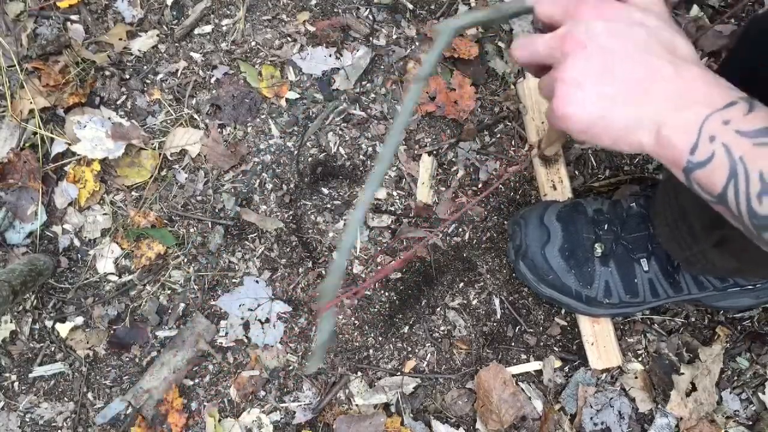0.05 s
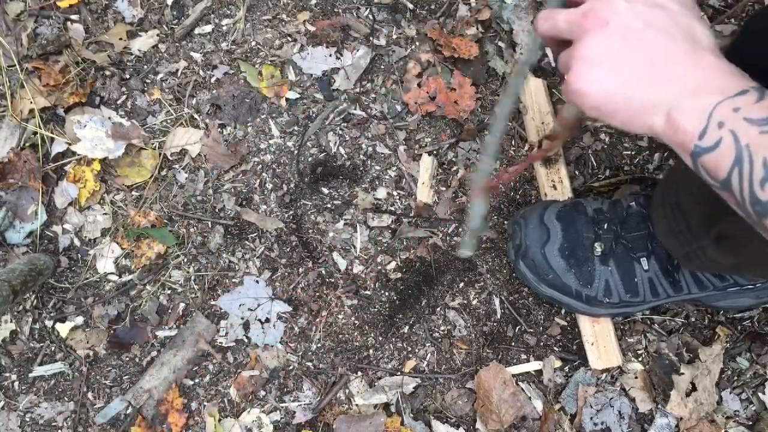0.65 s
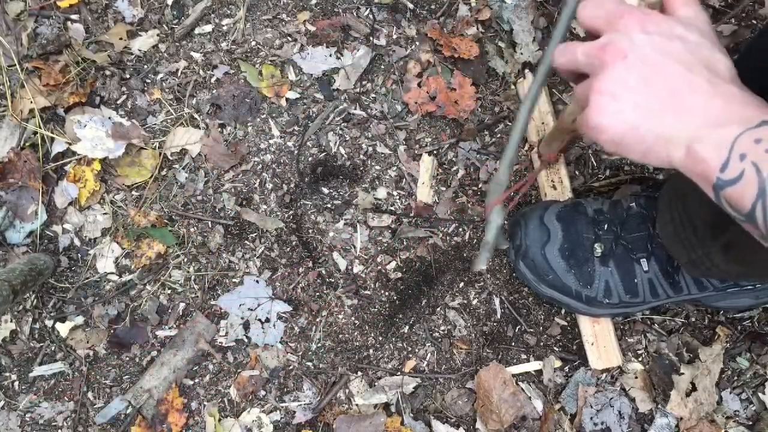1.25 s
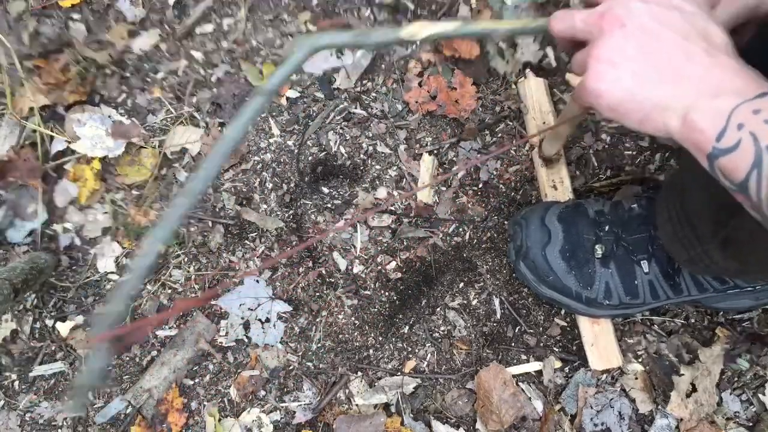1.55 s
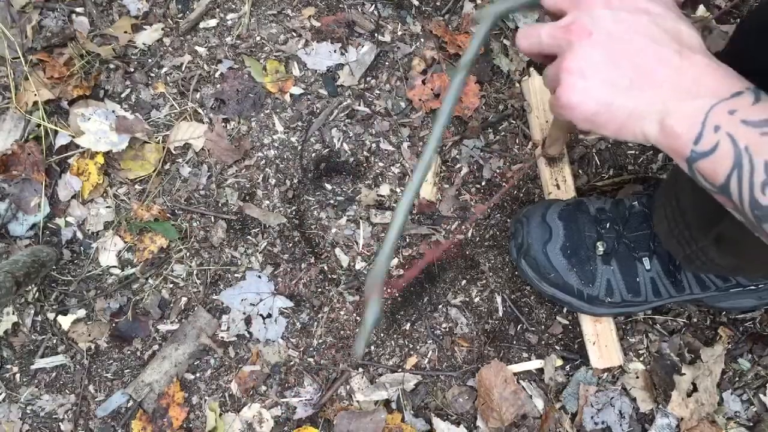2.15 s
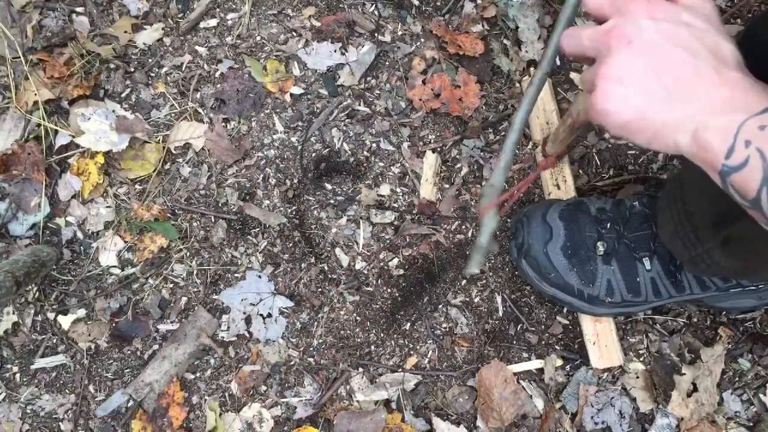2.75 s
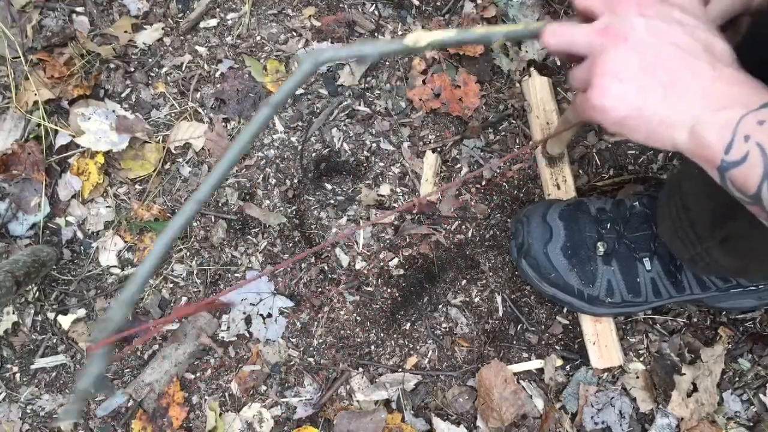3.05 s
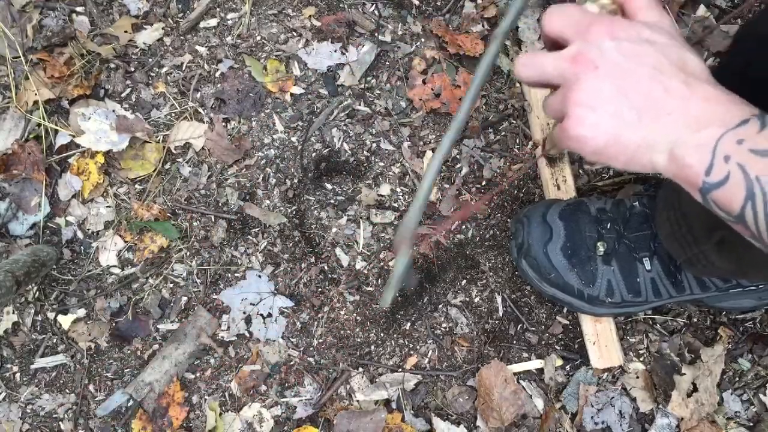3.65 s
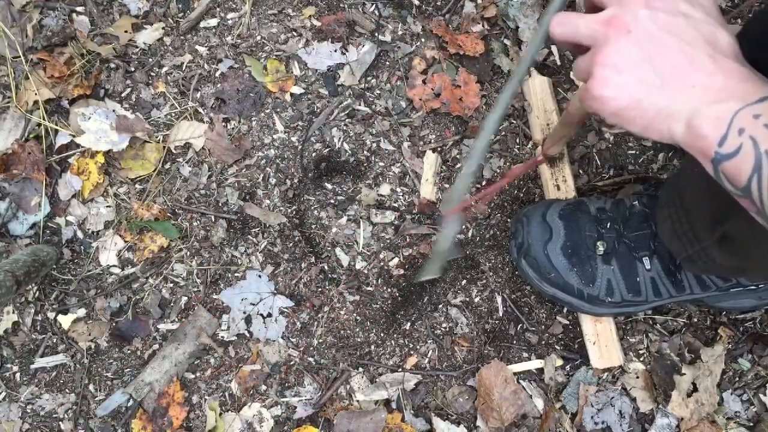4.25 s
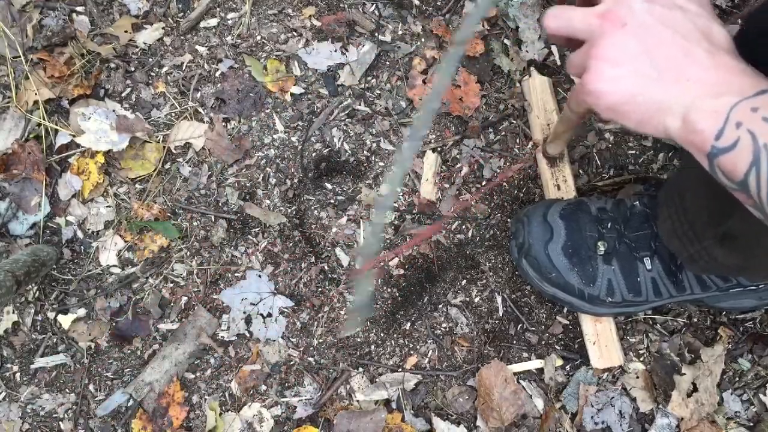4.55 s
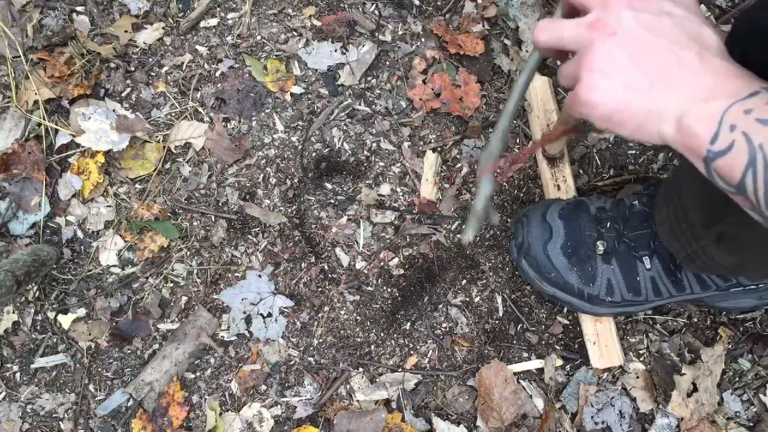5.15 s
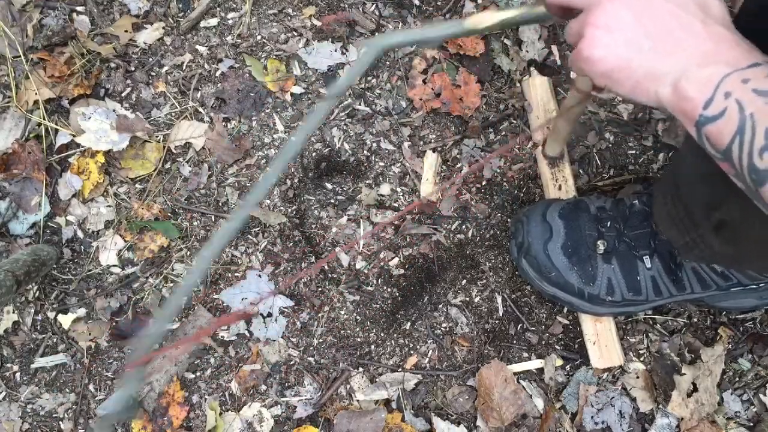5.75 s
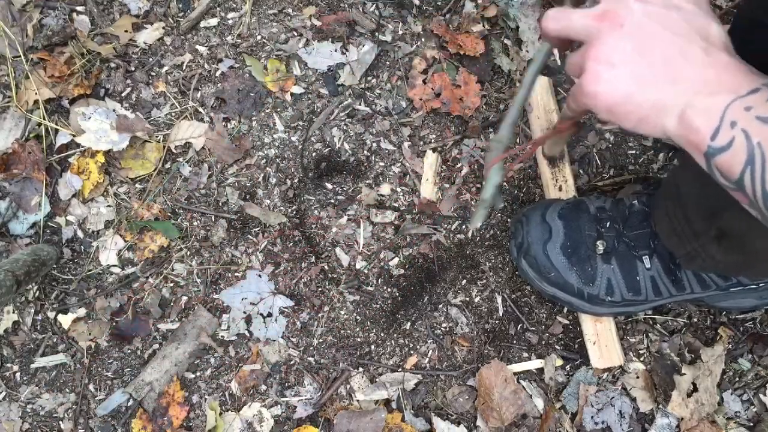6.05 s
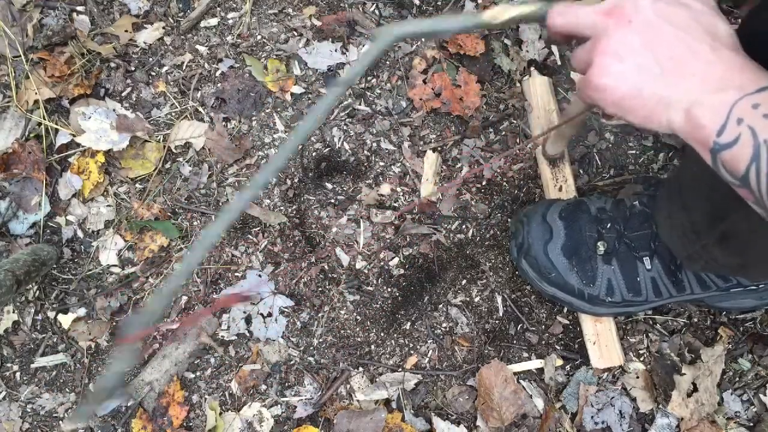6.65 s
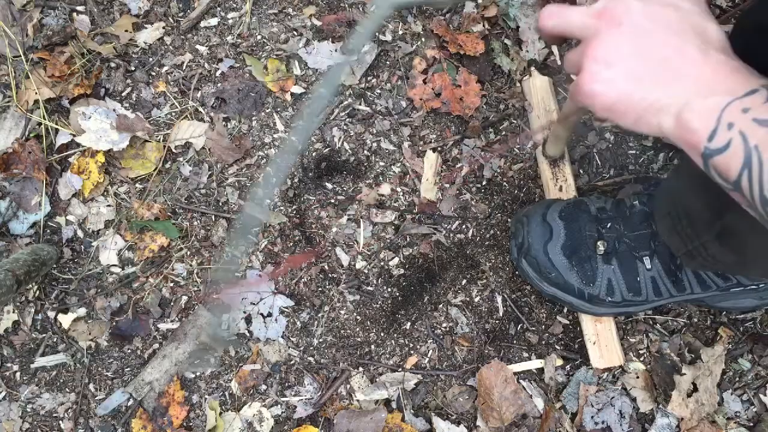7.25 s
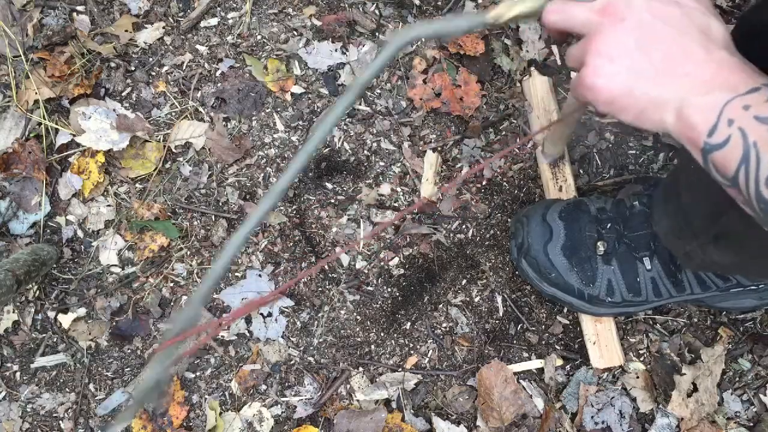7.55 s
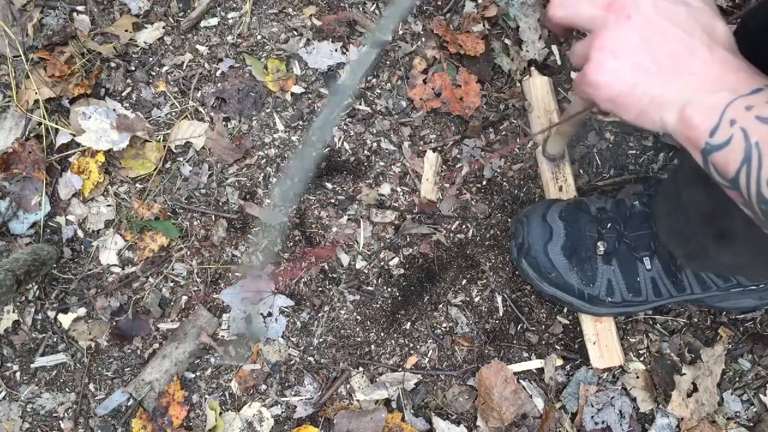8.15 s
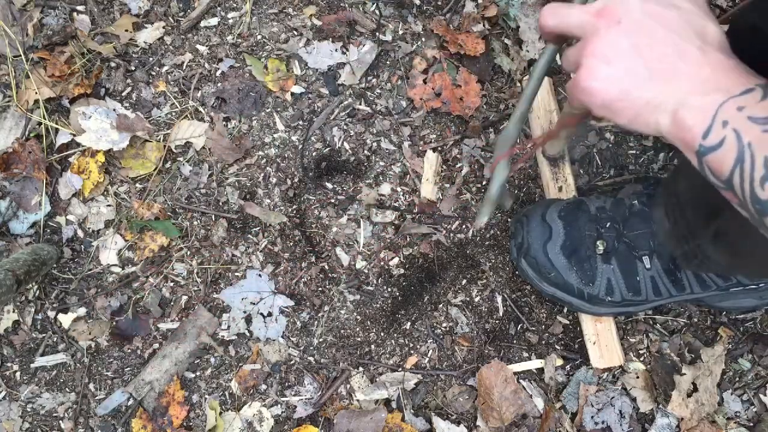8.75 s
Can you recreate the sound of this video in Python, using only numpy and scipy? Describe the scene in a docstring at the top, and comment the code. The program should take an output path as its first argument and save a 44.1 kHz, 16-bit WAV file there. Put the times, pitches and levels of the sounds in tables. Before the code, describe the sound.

A bow drill is sawn steadily back and forth, its wooden spindle grinding in a fireboard. Each pull gives a full, juddering grind and each push a thinner, groaning rasp, with a tiny gap at the turns. The strokes quicken slightly, with brief high squeaks, then hold their pace amid occasional ticks and dull knocks. It sounds close and dry over a low outdoor rumble.

```python
"""A bow drill is sawn back and forth over a low outdoor rumble, its wooden spindle grinding in a fireboard.
It opens on a pull, the spindle juddering in its socket; the grind stops as the bow turns, with a faint
hollow rub, and the push follows, rasping and groaning. Through the first five seconds or so the strokes
quicken and the spindle sometimes sticks and squeaks at a turn. The sawing then holds its pace to the end,
with the odd knock and tick from the gear along the way."""
import sys
import numpy as np
from scipy import signal
from scipy.fft import rfft, irfft, next_fast_len
from scipy.io import wavfile
from scipy.ndimage import uniform_filter1d, map_coordinates

SR = 44100
rng = np.random.default_rng(int(sys.argv[2]) if len(sys.argv) > 2 else 0)


def log_audio(samples):
    """Write samples as a 16-bit WAV file to the path given in sys.argv[1]."""
    # one column per channel
    frames = np.atleast_2d(samples).T
    # limit to full scale, then quantise
    limited = np.clip(frames, -1, 1)
    pcm = np.round(limited * 32767).astype(np.int16)
    wavfile.write(sys.argv[1], SR, pcm)


N = 387638

# The cycles of the bow. Each row: pull start and push start in seconds, then the relative levels in dB
# of the pull, the push and the hollow ring between them.
BOW = [(-0.082, 0.203, -39, -37.5, -63.0), (0.444, 0.723, -38, -36.5, -58),
       (0.985, 1.268, -38.5, -35, -75.0), (1.509, 1.785, -38.5, -36.6, -76.0),
       (2.03, 2.296, -39, -36.5, -55), (2.539, 2.797, -39.5, -36, -66.0), (3.036, 3.307, -40, -36, -58.5),
       (3.537, 3.759, -37.5, -36, -63), (3.996, 4.223, -37.5, -35, -54), (4.461, 4.698, -37.1, -35, -69.0),
       (4.925, 5.167, -39.5, -36.5, -69.0), (5.391, 5.618, -38.5, -35, -59.0),
       (5.844, 6.071, -38.5, -37.3, -54.5), (6.293, 6.52, -40.5, -36.5, -60), (6.739, 6.969, -38, -37, -57),
       (7.199, 7.437, -40.5, -38.0, -63.0), (7.651, 7.879, -40.0, -37, -49.5),
       (8.107, 8.327, -39, -36.5, -74.0), (8.547, 8.759, -38, -39, -62)]


def amp(db):
    """Decibels to gain."""
    return 10 ** (np.asarray(db) / 20)


def unit(x):
    """x at rms 1."""
    return x / np.sqrt(np.mean(x ** 2) + 1e-20)


def wobble(rate):
    """A smooth random curve, rate knots a second."""
    knots = rng.standard_normal(int(N * rate / SR) + 4)
    return map_coordinates(knots, [np.arange(N) * rate / SR])


def filtered(x, response):
    """x through an EQ, given as gain against frequency."""
    size = next_fast_len(len(x) + 8192)
    return irfft(rfft(x, size) * response(np.fft.rfftfreq(size, 1 / SR)), size)[:len(x)]


def coloured(x, colour, resonances=()):
    """x shaped by an EQ curve and resonant humps, at rms 1."""
    def response(f):
        points_hz, points_db = np.transpose(colour)
        curve = np.interp(np.log(f + 1), np.log(points_hz), points_db)
        humps = sum(db * np.exp(-2 * ((f - hz) / width) ** 2) for hz, width, db in resonances)
        return amp(curve + humps)
    return unit(filtered(x, response))


def add(track, start_s, sound):
    """Mix a sound into the track."""
    part = track[round(start_s * SR):][:len(sound)]
    part += sound[:len(part)]


def blow(colour, t60, rise_s=0.00042):
    """A noise burst that dies quickly in damped wood, at rms 1 over its first 10 ms."""
    t = np.arange(SR // 6) / SR
    envelope = amp(-60 * t / t60) * (1 - np.exp(-t / rise_s))
    burst = coloured(rng.standard_normal(len(t)), colour) * envelope
    return burst / np.std(burst[:SR // 100])


def reversals():
    """The seconds at which the bow stops and turns: pulls begin at the even ones, pushes at the odd."""
    last_stop_s = 8.988
    return np.append(np.array(BOW)[:, :2].ravel(), last_stop_s)


def stroke(skew, pushing):
    """Speed (0-1) and gain of the pulls or pushes: half sines from rest to rest, late if skew > 1."""
    stops = reversals()
    position = np.interp(np.arange(N) / SR, stops, np.arange(len(stops)))
    index, progress = position.astype(int), position % 1
    speed = np.sin(np.pi * progress ** skew) * (index % 2 == pushing)
    levels_db = np.array(BOW)[:, 2:4].ravel()
    return speed, amp(levels_db[index])


def outdoors(level_db, swell_db):
    """The bed: distant rumble with a low drone in it, and a faint, thin hiss."""
    # The EQ of the bed. Each row: frequency in Hz, level in dB.
    colour = [(20, -49), (35, -28), (52, -2.5), (80, -0.5), (103, 2), (135, -2.5), (200, -15), (300, -26),
              (700, -28.5), (1800, -28.5), (3200, -40), (4300, -28), (5200, -37.5), (16000, -45)]
    drone, hiss = (103, 11, 3.7), (4300, 260, 3.1)  # centre Hz, width Hz, lift dB
    return amp(level_db + swell_db * wobble(4)) * coloured(rng.standard_normal(N), colour, [drone, hiss])


def hollow_ring(gain_db, spread_s, lead_s):
    """A faint, hollow rub swells and fades around the turn from pull to push."""
    # The peaks that make it hollow. Each row: centre in Hz, width in Hz, lift in dB.
    peaks = [(407, 160, 23), (1770, 140, 23.5), (2730, 140, 8), (4000, 130, 14), (4280, 350, 14)]
    colour = [(300, -15), (1200, 3), (4500, -9.5), (7000, -16), (16000, -26.5)]
    t = np.arange(N) / SR
    swell = sum(amp(db) * np.exp(-.5 * ((t - turn + lead_s) / spread_s) ** 2) for _, turn, _, _, db in BOW)
    return amp(gain_db) * swell * coloured(rng.standard_normal(N), colour, peaks)


def knocks_and_ticks(knock_db):
    """Bow and spindle knock dully on the board; cord and wood fibre give dry, bright ticks."""
    # The knocks. Each row: start in seconds, relative level in dB, t60 in seconds.
    knocks = [(1.5368, -28.5, 0.11), (4.205, -40, 0.055), (6.489, -38.5, 0.062), (6.950, -38, 0.045)]
    # The board's dull tone. Each row: frequency in Hz, level in dB.
    board = [(40, -22.5), (100, 5), (340, -2), (630, -0.5), (1050, -10), (1400, -11), (2400, -15),
             (5000, -29), (16000, -36)]
    # The ticks. Each row: start in seconds, level in dB.
    ticks = [(2.157, -38), (3.067, -44), (3.324, -47), (4.176, -43), (4.207, -50), (5.729, -43),
             (6.459, -44), (6.493, -51), (6.957, -52), (7.402, -56), (7.486, -48), (7.829, -46),
             (8.273, -40)]
    bright = [(300, -13), (1500, -3), (4000, 0), (8000, -5), (16000, -8)]
    out = np.zeros(N)
    for start, db, t60 in knocks:
        add(out, start, amp(db + knock_db) * blow(board, t60, rise_s=0.00072))
    for start, db in ticks:
        add(out, start, amp(db) * blow(bright, t60=.015))
    return out


def ringing(x, t60):
    """A crowd of small wood modes gives x a short, dying tail."""
    t = np.arange(SR // 8) / SR
    tail = rng.standard_normal(len(t)) * amp(-60 * t / t60)
    return signal.fftconvolve(x, tail / np.linalg.norm(tail))[:N]


def squeaks(gain_db, waver, rough_db, rasp_db, ring_db, ring_t60):
    """The spindle sticks and slips for a few milliseconds: a rough, gliding chirp rings in the wood."""
    # The chirps. Each row: start and length in seconds, first and last pitch in Hz, relative level
    # in dB, overtones in dB against the fundamental.
    chirps = [(0.456, .0122, 11780, 11570, -30, -11), (1.798, .0198, 9060, 9150, -19.5, -49),
              (1.809, .0155, 11530, 11590, -36, -7), (2.518, .0075, 8710, 7700, -27.5, -10),
              (2.543, .02, 8330, 9300, -16.5, -20), (3.046, .0079, 8550, 8350, -24.5, -25),
              (3.051, 0.014, 7700, 8000, -25, -10), (3.06, .014, 8570, 9250, -19, -24),
              (3.318, 0.013, 11610, 11570, -33, -3.5), (3.513, .0075, 10600, 10350, -31, -2),
              (3.5626, .0061, 13130, 12930, -16, -20), (3.564, 0.013, 8700, 9380, -26.5, 0),
              (5.376, 0.009, 2910, 2630, -33.5, -1), (5.3932, 0.013, 2990, 3494, -25.3, 2.5),
              (5.404, 0.014, 3600, 3430, -32, -2)]
    # The spindle's high modes, excited by the rasp. Each row: centre in Hz, width in Hz, lift in dB.
    modes = [(3950, 400, 12.5), (5950, 600, 9), (8900, 900, 13), (11250, 700, 10), (13600, 1100, 8)]
    colour = [(900, -34.5), (1900, -9), (5000, -10.5), (9000, -1.0), (16000, -2.5)]
    out, drift, roughness = np.zeros(N), wobble(700), amp(rough_db * wobble(450))
    rasp = coloured(rng.standard_normal(N), colour, modes)
    for start, length, first_hz, last_hz, db, overtone_db in chirps:
        progress = np.linspace(0, 1, int(length * SR))
        span = slice(round(start * SR), round(start * SR) + len(progress))
        harsh = amp(overtone_db)  # harsher squeaks waver more and carry more rasp
        glide_hz = first_hz + (last_hz - first_hz) * progress
        hz = glide_hz * (1 + waver * (1 + 2.5 * harsh) * drift[span])
        phase = 2 * np.pi * np.cumsum(hz) / SR
        overtones = sum(np.sin(k * phase) * (k * hz < SR / 2) for k in range(2, 5))
        tone = np.sqrt(2) * (np.sin(phase) + harsh * overtones)
        grit = (amp(rasp_db) + harsh ** 2) * rasp[span]
        envelope = np.abs(np.sin(np.pi * progress ** 0.9)) * roughness[span]
        add(out, start, amp(db + gain_db) * envelope * (tone + grit))
    return out + amp(ring_db) * ringing(out, ring_t60)


def judder(boom_db, clack_db, clack_t60, rise_s, scatter_db):
    """At the height of each pull the spindle thumps four times, once a revolution: a boom and a clack."""
    # The judders. Each row: time of the central thump in seconds, its relative level in dB.
    judders = [(0.044, -42.5), (0.592, -36.5), (1.098, -37), (1.625, -34.5), (2.153, -36), (2.682, -36),
               (3.152, -35.5), (3.655, -34.5), (4.112, -28.5), (4.602, -32.5), (5.04, -35), (5.497, -28.5),
               (5.95, -31), (6.391, -35), (6.86, -32.5), (7.305, -38), (7.748, -32.5), (8.219, -33),
               (8.649, -32)]
    # The fireboard's low modes. Each row: nominal pitch in Hz, relative level in dB, t60 in seconds.
    modes = [(157, -8.5, 0.069), (396, -3.5, 0.049), (441.3, -1, 0.045), (665, -8, 0.07)]
    # The spindle's woody clack. Each row: frequency in Hz, level in dB.
    clack = [(200, -15), (600, -13), (930, 4), (1250, -3), (1550, -19), (2000, -8), (2900, -24),
             (3900, -12), (5200, -24), (16000, -44)]
    revolutions_per_stroke = 9.8
    build_db, fade_db = 7, 3.5  # drop one thump before and one after the centre
    sag_per_s, in_tune_s = .018, 4.8  # the boom sinks slowly in pitch as drilling goes on
    out, t, stops = np.zeros(N), np.arange(SR // 10) / SR, reversals()
    attack = 1 - np.exp(-t / rise_s)
    for centre, peak_db in judders:
        stroke_s = np.diff(stops)[np.searchsorted(stops, centre) - 1]
        tuning = 1 - sag_per_s * (centre - in_tune_s)
        for k in (-1, 0, 1, 2):
            start = centre + k * stroke_s / revolutions_per_stroke
            db = peak_db - (build_db if k < 0 else fade_db) * k ** 2 + rng.normal(0, scatter_db)
            boom = np.zeros(len(t))
            for hz, mode_db, t60 in modes:
                decay = amp(mode_db + rng.normal(0, 1.9) - 60 * t / t60)
                pitch_hz = hz * tuning * (1 + rng.normal(0, 0.053))
                boom += decay * np.sin(2 * np.pi * pitch_hz * t)
            add(out, start, amp(db + boom_db) * boom * attack)
            add(out, start, amp(db + clack_db) * blow(clack, clack_t60, rise_s))
    return out


def groan(speed, top_hz, gain_db, blur_rate):
    """The spindle groans, low and hoarse, rising and falling in pitch with its speed."""
    phase = 2 * np.pi * np.cumsum(top_hz * speed) / SR
    hoarse = wobble(blur_rate) * np.sin(phase) + wobble(blur_rate) * np.cos(phase)
    return amp(gain_db) * speed * unit(hoarse)


def fibres(per_second, spread_db):
    """Wood fibres snap at random with scattered strengths, over an equally strong smooth rub of dust."""
    snaps = (rng.random(N) < per_second / SR) * rng.standard_normal(N)
    snaps *= amp(spread_db * np.clip(rng.standard_normal(N), -2, 2))
    return unit(unit(snaps) + rng.standard_normal(N))


def patchy(x, depth_db):
    """The contact patch wanders, so each band swells and fades on its own."""
    bands = signal.stft(x, nperseg=512)[2]
    swells = uniform_filter1d(rng.standard_normal(bands.shape), 4, axis=0)  # smooth across frequency
    swells = uniform_filter1d(swells, 7, axis=1)  # and over time
    return signal.istft(bands * amp(depth_db * unit(swells)), nperseg=512)[1][:N]


def grinding(speed, colour, gain_db, easing, spin_hz, lobe_db, flutter_db, slow_treble_db):
    """Friction grows with speed, eases near the top and pulses as the out-of-round spindle spins."""
    # The resonances of spindle and board. Each row: centre in Hz, width in Hz, lift in dB.
    wood = [(406, 50, 5.5), (962, 224, 10), (1258, 190, 4.5), (4073, 630, 7.5), (6326, 810, 9.5),
            (8990, 1300, 8), (11450, 950, 6), (13800, 900, 3.5)]
    stick_speed, treble_hz = .19, 5000  # below this share of top speed the spindle hardly slips
    force = speed ** 2 / np.sqrt(1 + easing * speed ** 4)
    slipping = speed ** 4 / (speed ** 4 + stick_speed ** 4)
    angle = 2 * np.pi * np.cumsum(spin_hz * speed * amp(0.919 * wobble(10))) / SR
    contact = amp(lobe_db * (np.sin(angle) + np.sin(2 * angle)) + flutter_db * wobble(190))
    grain = patchy(contact * fibres(per_second=7000, spread_db=1.0), depth_db=2.5)
    scrape = coloured(grain, colour, wood)
    treble = filtered(scrape, lambda f: f ** 4 / (f ** 4 + treble_hz ** 4))
    shelf = amp(slow_treble_db * (1 - speed))  # flat at top speed
    return amp(gain_db) * force * slipping * (scrape + (shelf - 1) * treble)


def pulls():
    """The pull spins the spindle in a full-bodied grind, a little brighter at its slow ends."""
    # The friction's EQ on the pull. Each row: frequency in Hz, level in dB.
    colour = [(60, -37), (200, 3), (330, -9), (620, -7.5), (1250, -1), (1550, -5), (2100, 0.5), (2550, -2),
              (2950, -5.5), (3450, 1), (5200, -11), (7800, -17), (16000, -17)]
    speed, gain = stroke(skew=0.93, pushing=False)
    return gain * grinding(speed, colour, gain_db=0.27, easing=0.089, spin_hz=38.0,
                           lobe_db=1.36, flutter_db=1.03, slow_treble_db=2)


def pushes():
    """The push spins it back in a thinner rasp that brightens with speed, over a groan."""
    # The friction's EQ on the push. Each row: frequency in Hz, level in dB.
    colour = [(60, -30), (140, -11), (240, -8), (340, -20), (560, -19), (1250, -7.5), (1550, -13),
              (2000, -0.5), (2650, 0.95), (3100, -8), (4400, -10.5), (5200, -12.5), (7800, -21),
              (16000, -22)]
    speed, gain = stroke(skew=1.05, pushing=True)
    rasp = grinding(speed, colour, gain_db=2, easing=1.12, spin_hz=35.47,
                    lobe_db=1.31, flutter_db=0.85, slow_treble_db=-2)
    return gain * (rasp + groan(speed, top_hz=250.3, gain_db=-19, blur_rate=70))


def scene():
    """The mono mix: the drill close and dry over the outdoor bed, with no walls to answer."""
    drill = pulls() + pushes()
    drill += judder(boom_db=4.2, clack_db=-5, clack_t60=0.052, rise_s=0.0022, scatter_db=1.8)
    drill += squeaks(gain_db=-1.5, waver=0.0068, rough_db=1.5, rasp_db=-22.5, ring_db=-20, ring_t60=0.12)
    drill += knocks_and_ticks(knock_db=-4)
    drill += hollow_ring(gain_db=-1.5, spread_s=.036, lead_s=0.0043)
    return (drill + outdoors(level_db=-50.5, swell_db=1.24))[None]


def record(dry):
    """A steep low-pass takes off the very top."""
    cutoff_hz = 16100
    return filtered(dry[0], lambda hz: 1 / (1 + (hz / cutoff_hz) ** 120))[None]


dry = scene()
out = record(dry)
log_audio(out)
```